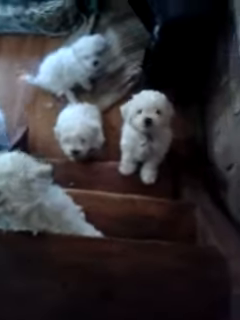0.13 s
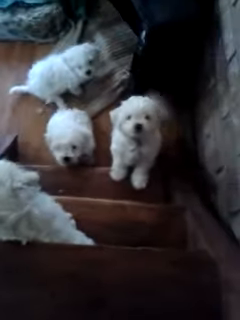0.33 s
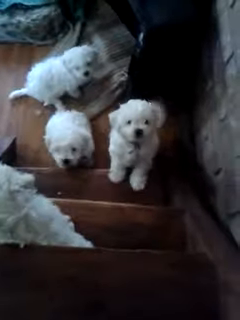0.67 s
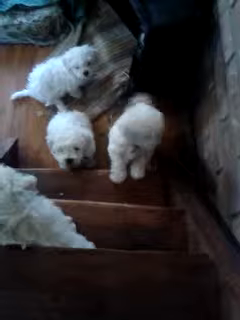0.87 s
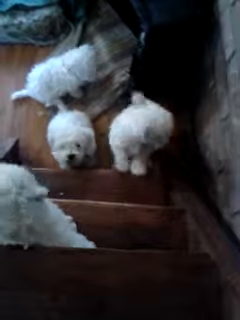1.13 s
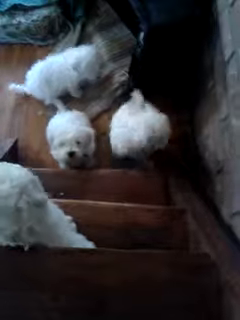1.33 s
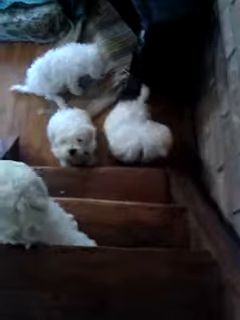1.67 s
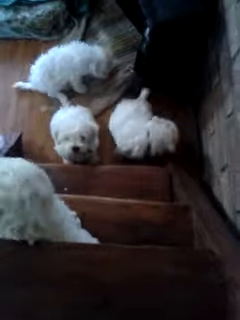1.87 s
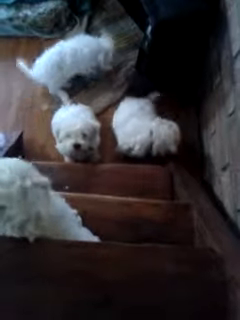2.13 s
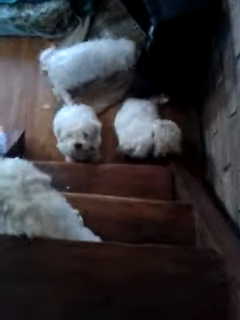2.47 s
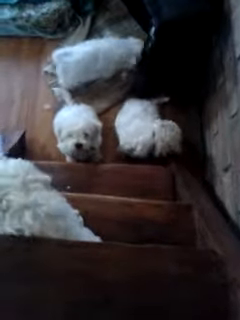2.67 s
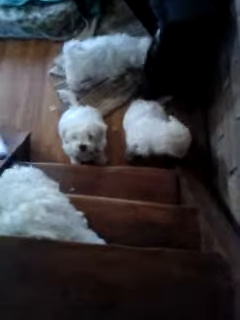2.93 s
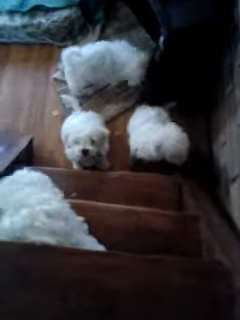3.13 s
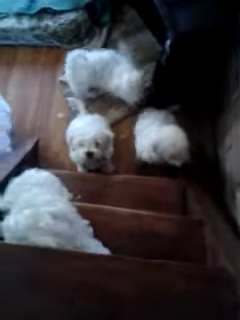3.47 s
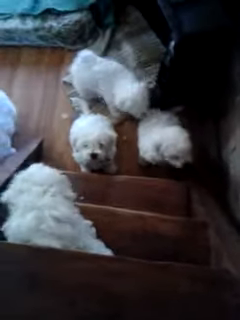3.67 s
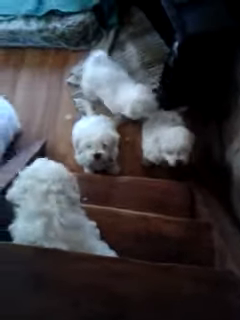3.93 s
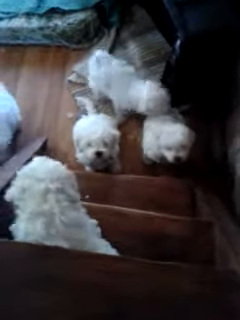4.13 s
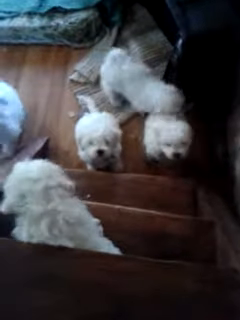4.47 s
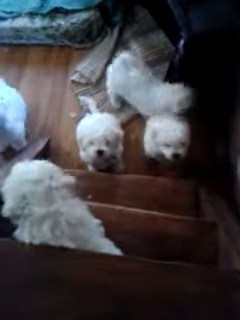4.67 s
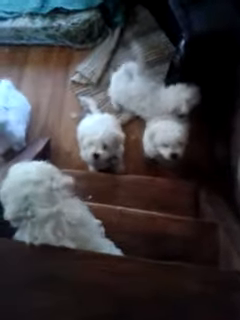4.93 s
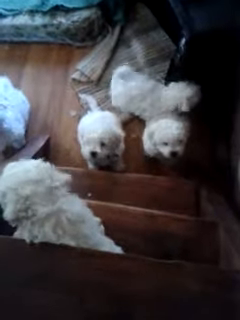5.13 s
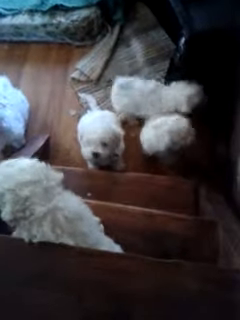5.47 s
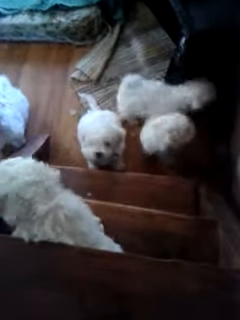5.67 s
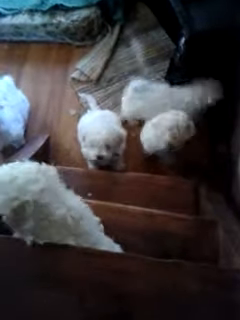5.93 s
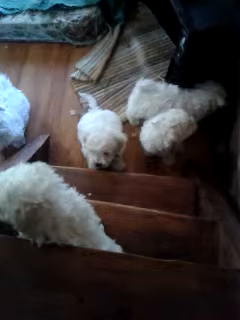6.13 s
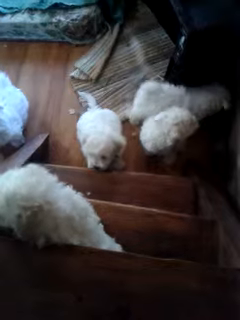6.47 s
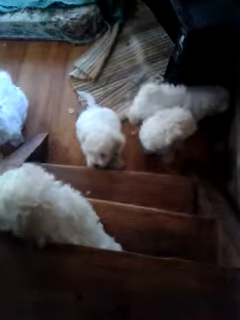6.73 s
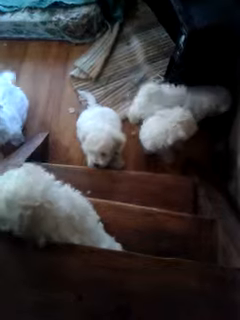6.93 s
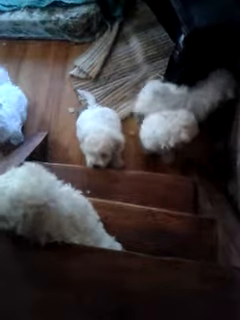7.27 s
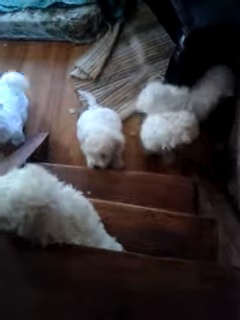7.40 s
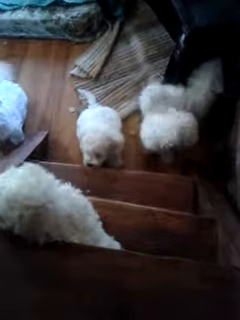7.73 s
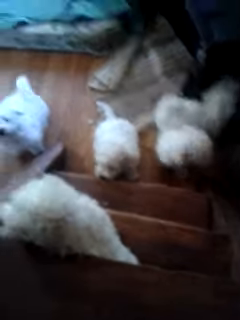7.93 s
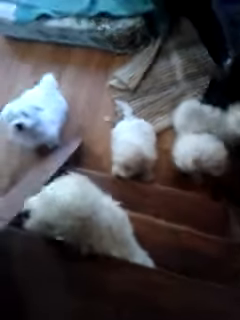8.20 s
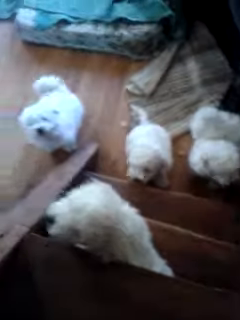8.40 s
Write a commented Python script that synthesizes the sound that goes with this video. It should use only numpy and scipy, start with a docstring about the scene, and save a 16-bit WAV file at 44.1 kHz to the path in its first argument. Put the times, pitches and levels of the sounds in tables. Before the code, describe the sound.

Small dogs whimper in a nearly constant stream at wooden stairs, high cries sliding down into creaks, over faint hiss, before a loud close click.

```python
"""Puppies whine at the foot of wooden stairs, close to a small mono microphone, over a steady hiss.
From the start come falling cries, each a tone with overtones and breath, and soon claws tick on the boards
and thin nose whistles, unsteady sines, sound far above. Then some cries break into creaky groans: uneven
pulses that ring a throat. Paws scuff later, and near the end one sharp click rings beside the microphone."""
import sys
import numpy as np
from scipy import signal
from scipy.fft import rfft, irfft, next_fast_len
from scipy.io import wavfile
from scipy.ndimage import uniform_filter1d, map_coordinates

SR = 44100
rng = np.random.default_rng(int(sys.argv[2]) if len(sys.argv) > 2 else 0)


def unload_audio(sound):
    """Save the sound as a 16-bit wav file, at the path given as the first command line argument."""
    columns = np.transpose(np.atleast_2d(sound))
    # keep every value between -1 and 1, then stretch to whole-number steps
    steps = np.round(np.clip(columns, -1, 1) * 32767)
    wavfile.write(sys.argv[1], SR, steps.astype(np.int16))


N = 378367

# Colour of rushing air, in the breath and in the scuffs.
# Each row: frequency in Hz, relative level in dB per Hz.
RUSHING_AIR = [(400, -9), (1200, 1), (2300, -7.5), (4300, -5), (7800, -2.5), (10500, -11), (15000, -100)]


def amp(db):
    """Turn decibels into a plain factor."""
    return 10 ** (np.asarray(db) / 20)


def unit(x):
    """Scale a sound to an rms (average strength) of 1."""
    return x / np.sqrt(np.mean(x ** 2) + 1e-20)


def along(points, hz):
    """Read a curve of (Hz, value) points, with straight lines on a log frequency axis."""
    point_hz, values = np.transpose(points)
    return np.interp(np.log(hz + 1), np.log(point_hz + 1), values)


def filtered(x, response):
    """Multiply the spectrum of x by a response, which may be complex."""
    size = next_fast_len(len(x) + SR // 4)  # spare room for the ringing
    hz = np.fft.rfftfreq(size, 1 / SR)
    return irfft(rfft(x, size) * response(hz), size)[:len(x)]


def noise(spectrum):
    """Coloured noise with an rms of 1."""
    return unit(filtered(rng.standard_normal(N), lambda hz: amp(along(spectrum, hz))))


def wobble(n, rate):
    """A smooth random curve through a given number of random points a second."""
    knots = rng.standard_normal(int(n * rate / SR) + 4)
    return map_coordinates(knots, [np.arange(n) * rate / SR])


def call(rows, fade, release=None):
    """Give a call's sample positions, its soft-edged window (fades in s) and its columns."""
    times, *columns = np.transpose(rows)
    at = np.arange(round(times[0] * SR), min(round(times[-1] * SR), N))
    rise = (at - at[0]) / fade
    fall = (at[-1] - at) / (release or fade)
    window = np.clip(np.minimum(rise, fall) / SR, 0, 1)
    return at, window, [np.interp(at / SR, times, column) for column in columns]


def cries():
    """Tight vocal folds give a nearly pure tone, a few overtones and some hiss."""
    # Long whines. Each row: voicing, then points along the call.
    # Voicing: octave level in dB, higher overtones in dB and hiss in dB, all beside the colour of the mouth
    # and before tightness acts, then bright resonance in Hz.
    # Each point: time in seconds, pitch in Hz, fundamental level in dB.
    whines = [ ((3, -5.5, -28, 4600), [(0.0, 650, -38), (0.025, 627.5, -50.5), (0.085, 696, -40),
              (0.103, 754, -66)]), ((8.5, -1, -21, 5203), [(0.455, 1253, -60.5), (0.489, 1150, -55),
              (0.515, 1145, -58), (0.583, 847, -58), (0.615, 723, -54), (0.7, 681, -60.5)]),
              ((12, 4.5, -40, 5300), [(0.26, 1836, -59), (0.28, 1776, -53.5), (0.292, 1772, -59),
              (0.298, 1730, -41.5), (0.305, 1663, -61), (0.317, 1567, -47.5), (0.345, 1098, -53.5),
              (0.43, 921, -61), (0.485, 816, -61.5), (0.6, 774, -58.5)]), ((16, 7.5, -17, 5000),
              [(1.145, 1670, -77), (1.16, 1644, -45), (1.186, 1435, -44.5), (1.214, 1282, -62),
              (1.26, 1115, -56), (1.32, 1086, -57.5), (1.342, 1164, -49)]), ((-6.5, -7.5, -27.5, 4504),
              [(1.343, 718, -46.5), (1.37, 637, -43), (1.4, 726, -46), (1.44, 672.5, -53), (1.48, 755, -48),
              (1.57, 718, -59)]), ((-8, -20, -14, 4503), [(1.545, 910, -51.5), (1.563, 1307, -42),
              (1.58, 1340, -43), (1.605, 1326, -64)]), ((-33, -28, -44, 4500), [(1.637, 682, -49),
              (1.74, 695, -55.5), (1.8, 707, -65), (1.89, 693.5, -49.5), (1.915, 673, -58),
              (1.94, 675, -46), (2.015, 688, -51), (2.03, 702, -74)]), ((4, 4.5, -23, 3903),
              [(2.418, 1037, -55.5), (2.44, 987, -51.5), (2.455, 1410, -41), (2.5, 1222, -46.5),
              (2.53, 1008, -51), (2.672, 745, -48), (2.712, 735, -42.5), (2.745, 699, -54.5),
              (2.77, 693.5, -43), (2.8, 703, -57.5), (2.84, 687, -43), (2.893, 663, -36), (2.915, 649, -62),
              (2.958, 601.5, -41), (3.01, 596, -78)]), ((2.5, -8, -20.5, 4000), [(3.01, 1190, -55),
              (3.045, 1126, -43), (3.09, 957, -54), (3.2, 900, -50.5), (3.34, 790, -56.5),
              (3.39, 835, -49.5), (3.425, 775, -46.5), (3.455, 626.3, -46.5), (3.505, 536, -49)]),
              ((-1, 2.5, -36, 3902), [(3.175, 1235, -64), (3.184, 1015, -48.5), (3.33, 989, -49.5),
              (3.375, 855, -49.5), (3.47, 880, -57.5)]), ((2, 4.5, -19.5, 4000), [(3.69, 900, -54),
              (3.74, 1087, -50.5), (3.79, 1002, -52), (3.9, 670, -49), (3.955, 654, -46.5), (4.0, 608, -46),
              (4.03, 586, -47), (4.045, 558, -62)]), ((0, -15, -51, 4198), [(3.86, 1438, -68),
              (3.9, 1372, -43.5), (3.935, 1032, -49), (3.975, 890, -52.5), (4.0, 682, -42),
              (4.035, 687, -43)]), ((-0.5, 2.5, -16, 4200), [(4.335, 696, -47), (4.355, 679, -43.5),
              (4.39, 802, -54), (4.425, 763, -41), (4.46, 728, -54.5), (4.5, 810, -61)]),
              ((-32, -5, -20, 4500), [(4.53, 725, -61), (4.575, 675.3, -44.5), (4.625, 680.5, -68),
              (4.66, 674.3, -53.5), (4.71, 689, -64), (4.795, 685.3, -51), (4.814, 669, -57),
              (4.838, 687, -48), (4.89, 670, -55.5)]), ((-0.5, -8.5, -47, 3800), [(5.195, 1240, -47.5),
              (5.215, 1088, -45), (5.245, 1143, -46), (5.27, 941, -54.5), (5.33, 844, -52),
              (5.36, 716.5, -43.5), (5.41, 652, -48.5)]), ((3.5, -11.5, -24, 4000), [(5.752, 1405, -46.5),
              (5.79, 1285, -44), (5.805, 1213, -51.5), (5.89, 966, -52), (5.935, 787, -52),
              (6.005, 883, -50.5), (6.12, 815.6, -55.5), (6.178, 785, -55), (6.2, 756.5, -48.5),
              (6.275, 694, -54.5)]), ((2.5, -2.5, -37, 5200), [(7.3, 1154, -61), (7.325, 1058, -61),
              (7.335, 901, -55.5), (7.425, 833, -57.5), (7.5, 842, -54)]), ]
    # Short yips. Each row: start in seconds, length in seconds, first Hz, last Hz, bend (under 1 the glide
    # comes early), first dB, last dB, then octave, higher overtones and hiss in dB as above.
    yips = [ (0.935, 0.15, 1128, 786, 1.2, -56, -67, 6, -5, -30),
            (1.006, 0.17, 439, 448, 3.6, -59, -59, -1, -12, -43),
            (1.086, 0.075, 1870, 1850, 0.79, -51, -49, -8, 3, -30),
            (1.088, 0.045, 803, 729, 1.4, -47.5, -47, 0, -1, -20),
            (1.178, 0.033, 900, 1290, 2.6, -55, -55, -4, -20, -48),
            (1.203, 0.04, 548, 690, 0.93, -50, -57, -4, -18, -18.5),
            (4.051, 0.09, 622, 756, 0.6, -45.5, -54, -17, -14, -19),
            (4.421, 0.13, 1152, 767, 0.56, -55.5, -49, 2, -6, -26),
            (6.261, 0.08, 687, 717, 2.2, -47, -58, -7, -20, -47),
            (6.219, 0.034, 1093, 1230, 1.8, -57, -60, -10, -24, -54),
            (6.565, 0.047, 1433, 1260, 1.46, -47.5, -64, 9, -19, -20),
            (6.894, 0.033, 1007, 1046, 1.7, -63.5, -55.5, 13, -15, -17),
            (7.786, 0.086, 853, 797, 1.7, -62.5, -67.5, 4.5, -21, -14.5),
            (7.992, 0.26, 850, 875, 0.62, -56, -70, -8, -21, -27),
            (8.025, 0.12, 1391, 1416, 1.1, -45, -67.5, -26, -16, -46.5),
            (8.089, 0.048, 1397, 1063, 1.1, -58, -64, -10, 4, -30),
            (8.28, 0.048, 898, 850, 1.04, -58.5, -82, 6, 11, -29),
            (8.464, 0.12, 873, 925, 0.46, -60.5, -72, 3.5, -24, -34), ]
    # Colour of mouth and nose. Each row: frequency in Hz, level in dB.
    mouth = [(400, -6), (670, 0), (900, -6), (1400, -12), (2000, -20), (2300, -37), (2750, -32),
             (3400, -32), (4300, -32), (5400, -34), (8000, -36), (11000, -52)]
    attack_s, release_s = .006, .005
    effort_s = .07  # overtones follow the effort averaged over this time
    # above this pitch, tighter folds weaken the octave and higher overtones, and leak less air
    tight_above_hz = 960
    octave_loss, higher_loss, hiss_loss = 24, 8, 22  # dB per octave of pitch
    bright_height_db, bright_octaves = 9, .3  # bright resonance: height, and distance to 1/e of it
    glide_loss_db = .6  # higher overtones lose this per octave a second of glide

    out, hiss = np.zeros(N), noise(RUSHING_AIR)
    for (octave_db, higher_db, hiss_db, bright_hz), rows in whines + [glide(*yip) for yip in yips]:
        at, window, (hz, db) = call(rows, fade=attack_s, release=release_s)
        n = len(at)
        turn = 2 * np.pi * np.cumsum(hz * (1 + .011 * wobble(n, 55))) / SR

        # strength at the folds, before the mouth colours it
        smooth_db = uniform_filter1d(db, size=round(effort_s * SR), mode='nearest')
        effort_db = smooth_db - along(mouth, hz)

        tight = np.maximum(np.log2(hz / tight_above_hz), 0)
        octave_db = octave_db - octave_loss * tight
        higher_db = higher_db - higher_loss * tight
        hiss_db = hiss_db - hiss_loss * tight
        glide_speed = np.abs(np.gradient(np.log2(hz))) * SR  # octaves a second
        higher_db = higher_db - glide_loss_db * uniform_filter1d(glide_speed, size=SR // 50)

        tone = amp(db) * np.sin(turn)
        for k in range(2, 13):
            bright_db = bright_height_db * np.exp(-(np.log2(k * hz / bright_hz) / bright_octaves) ** 2)
            voicing_db = octave_db if k == 2 else higher_db
            overtone_db = effort_db + voicing_db + along(mouth, k * hz) + bright_db
            # overtones come and go in patches, their phase unsteady; the higher ones more so
            flicker_db = 3 if k == 2 else 4
            strength = amp(overtone_db + flicker_db * wobble(n, 32))
            phase = k * turn + .045 * flicker_db ** 2 * wobble(n, 120)
            tone += strength * np.sin(phase)
        voice = np.sqrt(2) * tone * amp(1.5 * wobble(n, 44))
        breath = amp(effort_db + hiss_db) * hiss[at]
        out[at] += window * (voice + breath)
    return out


def glide(start, length, first_hz, last_hz, bend, first_db, last_db, *voicing):
    """A yip slides once from its first pitch to its last while its level ramps."""
    bright_hz = 4900
    hold = 1.9  # over 1, a yip stays near its first level longer
    u = np.linspace(0, 1, num=24)  # share of the yip gone by
    hz = first_hz * (last_hz / first_hz) ** u ** bend
    db = first_db + (last_db - first_db) * u ** hold
    return (*voicing, bright_hz), np.transpose([start + length * u, hz, db])


def groans():
    """Slack folds snap shut slowly and unevenly; each snap rings the throat."""
    # Each row: start in seconds, length in seconds, first and last pulses per second, first and last level
    # in dB, mean unevenness (0 to 1), factor on the throat's frequencies, nasal ring lift in dB.
    creaks = [ (0.666, 0.37, 219, 208, -51, -59.5, 0.33, 1.014, 0),
              (1.644, 0.43, 146, 156, -57.5, -61, 0.3, 1.04, 0.5),
              (3.471, 0.079, 174, 137, -51, -60, 0.61, 0.77, -1),
              (4.04, 0.17, 325, 230, -46, -54, 0.72, 0.828, -1.5),
              (4.525, 0.37, 144, 139, -55, -54, 0.31, 1.01, 0),
              (5.39, 0.087, 303, 290, -54.5, -52.5, 0.24, 0.95, -8),
              (5.456, 0.084, 194, 240, -50.5, -53, 0.31, 0.99, -0.5),
              (5.521, 0.065, 270, 247, -51.5, -55, 0.19, 1.06, 3.5),
              (6.268, 0.08, 225, 225, -61, -50.5, 0.3, 1.03, -6),
              (6.342, 0.128, 154, 152, -54, -54, 0.14, 1.1, -4.5),
              (7.486, 0.17, 185, 160, -59, -54.5, 0.08, 1.09, -3.5),
              (6.883, 0.072, 200, 200, -57, -74, 0.57, 1.72, 5),
              (7.887, 0.092, 160, 213, -54.5, -61, 0.34, 0.97, -2),
              (7.991, 0.023, 260, 206, -45, -52, 0.28, 0.93, -2), ]
    # Resonances: nasal ring, three of the mouth, rasp, chest.
    # Each row: frequency in Hz before the groan's factor, width in Hz, level in dB before any lift.
    resonances = [(663, 58, 4), (832, 333, -6.5), (1098, 247, -6), (1670, 150, -10), (4660, 1110, -22),
                  (268, 650, -22)]
    fray = .89  # unevenness grows by this share of its mean from start to end
    gap_hz, gap_width_hz = 2550, 1500  # the nasal passage swallows this band
    puff = .08  # strength of escaping air beside a snap
    rasp_db = 14  # rise of the rasp from an even groan to a wholly uneven one

    def gap(f):
        left = gap_hz ** 2 - f * f
        return left / (left + 1j * f * gap_width_hz)

    out = np.zeros(N)
    for start, length, first_rate, last_rate, first_db, last_db, mean_uneven, scale, nasal_db in creaks:
        ends = [(start, first_rate, first_db, mean_uneven * (1 - fray / 2)),
                (start + length, last_rate, last_db, mean_uneven * (1 + fray / 2))]
        at, window, (rate, db, uneven) = call(ends, fade=.012)
        n = len(at)
        lift_db = [nasal_db, 0, 0, 0, rasp_db * mean_uneven, 0]

        def throat(f):
            total = 0
            for k, (centre, width, level) in enumerate(resonances):
                ring = 1j * f * width / ((scale * centre) ** 2 - f * f + 1j * f * width)
                total = total + (-1) ** k * amp(level + lift_db[k]) * ring  # signs alternate
            return total

        # the running count of cycles is uneven but never goes back
        cycles = np.maximum.accumulate(np.cumsum(rate / SR) + .22 * uneven * wobble(n, 120))
        pulses = np.diff(np.floor(cycles), prepend=0) * amp(2.5 * uneven * rng.standard_normal(n))
        shut = uniform_filter1d(pulses, size=13)
        # bright air escapes once a cycle
        puffs = (1 + np.cos(2 * np.pi * cycles)) * np.diff(rng.standard_normal(n + 1))
        snaps = shut + puff * mean_uneven * uniform_filter1d(puffs, size=5)
        voice = unit(filtered(snaps, lambda f: throat(f) * gap(f)))
        out[at] += window * amp(db + 1.3 * wobble(n, 35)) * voice
    return out


def whistles():
    """Air through a narrowed nostril: an unsteady sine, with a faint octave if it fits below SR / 2."""
    # Each row: start in seconds, end in seconds, first Hz, last Hz, mean level in dB.
    nose_notes = [(0.201, 0.295, 11220, 11500, -63.5), (1.027, 1.1, 11200, 12300, -65.5),
                  (1.526, 1.613, 7670, 8150, -67), (1.794, 1.857, 7900, 7690, -68),
                  (2.399, 2.436, 7780, 7780, -56.5), (2.939, 3.023, 8800, 8860, -59.5),
                  (3.676, 3.717, 7650, 7440, -64), (3.756, 3.882, 8550, 9300, -57),
                  (4.377, 4.43, 8800, 9030, -57), (4.729, 4.762, 7860, 7680, -65),
                  (5.106, 5.142, 8800, 9120, -61), (5.357, 5.401, 11800, 11470, -63.5),
                  (5.664, 5.757, 8280, 7900, -63), (6.158, 6.19, 11500, 11500, -62),
                  (6.508, 6.583, 7700, 8540, -62), (6.663, 6.817, 7940, 7590, -55.5),
                  (6.839, 6.96, 11600, 11570, -71), (7.197, 7.335, 11500, 11200, -65.5),
                  (7.904, 8.045, 11550, 11220, -56.5), (8.029, 8.148, 11300, 11770, -61.5),
                  (8.243, 8.449, 8570, 8880, -76)]
    out = np.zeros(N)
    for start, end, first_hz, last_hz, db in nose_notes:
        at, window, (hz,) = call([(start, first_hz), (end, last_hz)], fade=.006)
        turn = 2 * np.pi * np.cumsum(hz * (1 + .0038 * wobble(len(at), 67))) / SR
        tone = np.sin(turn) + amp(-28) * (hz < SR / 4) * np.sin(2 * turn)
        out[at] += window * np.sqrt(2) * amp(db + 4.5 * wobble(len(at), 40)) * tone
    return out


def claws():
    """Each step is a dry tick of the claw and a dull thud of the board, both dying noise."""
    # Each row: time in seconds, relative tick level in dB, relative thud level in dB.
    steps = [(0.129, -64, -62.5), (0.4696, -72, -60), (0.51, -52.5, -70), (1.459, -55.5, -64),
             (1.52, -37.5, -56.5), (1.994, -70, -57), (2.3174, -67, -57.5), (3.284, -48, -78),
             (3.3871, -48.5, -64), (4.1236, -68, -51.5), (5.204, -58, -62), (6.252, -79, -54.5),
             (8.4615, -50.5, -82)]
    out, t = np.zeros(N + SR), np.arange(SR // 20) / SR

    def nail(f):
        """A broad resonance around 5 kHz, applied twice."""
        return (1j * f * 6000 / (5000 ** 2 - f * f + 1j * f * 6000)) ** 2

    for s, tick_db, thud_db in steps:
        tick = rng.standard_normal(len(t)) * amp(tick_db + 5.5 - 60 * t / .033)
        # moving averages take the treble off the thud
        dull = uniform_filter1d(rng.standard_normal(len(t)), size=40)
        thud = uniform_filter1d(dull * amp(thud_db + 26 - 60 * t / .016), size=8)
        out[round(s * SR):][:len(t)] += filtered(tick, nail) + thud
    return out[:N]


def click():
    """One snap builds up in a fraction of a millisecond and rings a small hard shell."""
    # Each row: time in seconds, level in dB.
    moments = [(8.0322, -3)]
    # What the click rings. Each row: frequency in Hz, relative level in dB, time to fall 60 dB in seconds.
    shell = [(265, -15, 0.0072), (2950, -15.5, 0.0076), (4450, -17, 0.003), (5760, -18.5, 0.0095),
             (7030, -7.5, 0.0022), (8800, -12, 0.0023), (11500, -22, 0.0025), (14670, -32, .002)]
    out, t = np.zeros(N), np.arange(-SR // 500, SR // 20) / SR
    for s, db in moments:
        ring = np.zeros(len(t))
        for hz, level, t60 in shell:
            # the high modes swing inward at the snap, the low one outward
            swing = np.sign(1000 - hz) * np.cos(2 * np.pi * hz * t)
            ring += swing * amp(level - 60 * np.maximum(t, 0) / t60)
        build_up = np.exp(np.minimum(t, 0) / .0002)
        out[round((s + t[0]) * SR):][:len(t)] += amp(db) * ring * build_up
    return filtered(out, lambda f: 1j * f / (1j * f + 70))  # less bass below 70 Hz


def stairwell(x):
    """An echo made of noise in which each frequency dies at its own speed."""
    # Each row: frequency in Hz, time to fall 60 dB in seconds.
    dying_times = [(300, 0.21), (1500, 0.25), (8000, 0.12)]
    hz, t, z = signal.stft(rng.standard_normal(SR // 2), SR, nperseg=256)
    decay = amp(-60 * t / along(dying_times, hz)[:, None])
    tail = signal.istft(z * decay, SR, nperseg=256)[1]
    late = np.pad(x, (200, 0))  # the echo starts 200 samples late
    return signal.fftconvolve(late, tail / np.linalg.norm(tail))[:N]


def background():
    """Steady hiss of room and microphone, and patchy scuffs of paws on the mat that die away."""
    # Colour of the steady hiss. Each row: frequency in Hz, relative level in dB per Hz.
    room_hiss = [(12, -47), (20, 2.5), (161, -6), (438, -12.5), (1130, -18.5), (15400, -30)]
    # Each row: start in seconds, first level in dB before the patchiness, time to fall 60 dB in seconds.
    shuffles = [(1.518, -57, 0.84), (1.759, -63.5, 0.28), (2.275, -62.5, 0.19), (2.318, -58.5, 0.34),
                (3.06, -60.5, 1), (3.282, -61.5, 0.53)]
    t = np.arange(N) / SR
    scuffs = sum((t > s) * amp(db - 60 * np.abs(t - s) / t60) for s, db, t60 in shuffles)
    patches = amp(1.6 * wobble(N, 38.95))
    steady = amp(-65.5) * noise(room_hiss + [(15500, -120)])  # steep cut at the top
    return steady + scuffs * patches * noise(RUSHING_AIR)


def scene():
    """All pups share the stairwell's echo; one microphone feeds both channels."""
    pups = cries() + groans() + whistles() + claws()
    mono = pups + amp(-7) * stairwell(pups) + click() + background()
    return np.array([mono, mono])


def record(dry):
    """Nothing is kept from the band limit up."""
    top_hz = 16790
    return np.array([filtered(x, lambda hz: hz < top_hz) for x in dry])


dry = scene()
out = record(dry)
unload_audio(out)
```